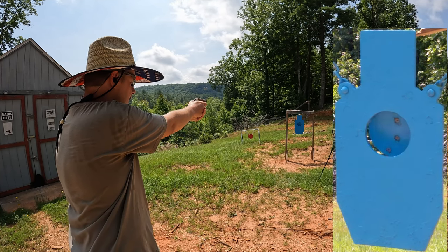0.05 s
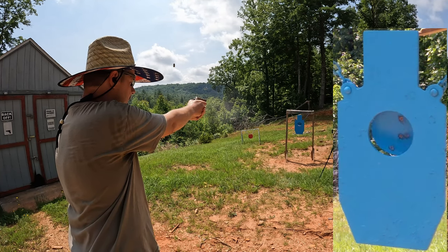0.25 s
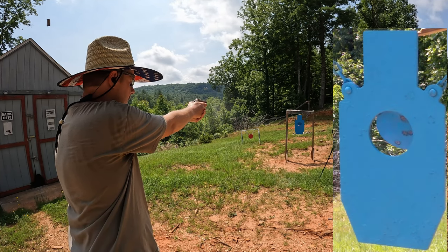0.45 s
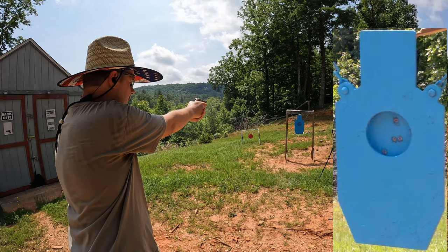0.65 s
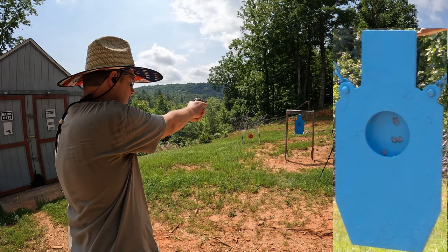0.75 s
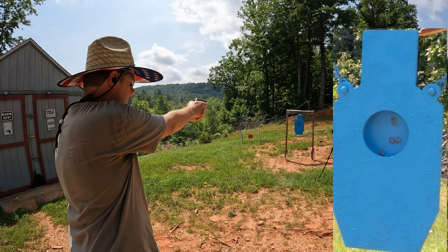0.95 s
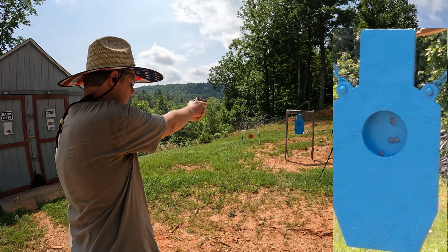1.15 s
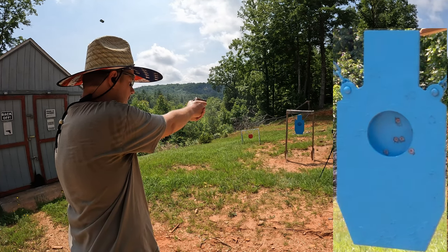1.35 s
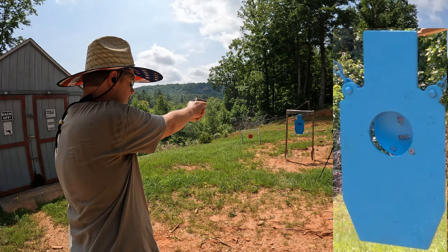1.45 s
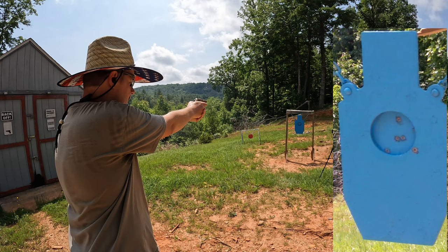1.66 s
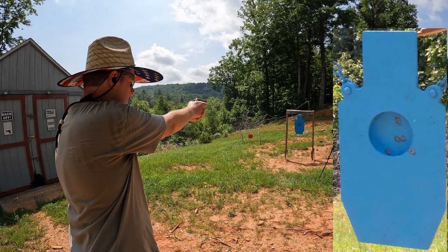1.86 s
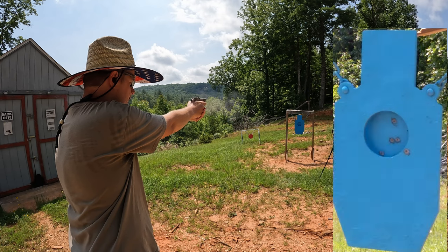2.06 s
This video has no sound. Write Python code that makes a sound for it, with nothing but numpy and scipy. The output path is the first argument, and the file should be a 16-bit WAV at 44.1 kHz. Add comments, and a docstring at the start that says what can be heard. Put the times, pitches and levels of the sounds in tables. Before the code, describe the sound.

Two sharp, overloaded pistol shots about a second apart, each followed almost instantly by a bright steel clang, then a softer clank as the hinged plate shuts; echoes roll through woods, close camera microphone, nearly mono.

```python
"""An outdoor range: two pistol shots, pulse and crack, overload a camera microphone; shed and tree line throw them back.
Each bullet clangs on a close steel target, built from decaying sines and a noise splash, and knocks its hinged
centre plate open; about half a second later the plate falls shut with a clank. The woods roll with filtered-noise
echoes, faint pure ticks sound, and the steel still rings from an earlier hit."""
import sys
import numpy as np
from scipy import signal
from scipy.fft import rfft, irfft
from scipy.io import wavfile
from scipy.ndimage import uniform_filter1d, minimum_filter1d

SR = 44100
rng = np.random.default_rng(int(sys.argv[2]) if len(sys.argv) > 2 else 0)


def output_pcm(signal):
    """Save a mono or channel-first signal as 16-bit PCM at the path in sys.argv[1].

    Samples are clipped to [-1, 1] before scaling.
    """
    pcm = np.clip(np.atleast_2d(signal).T, -1, 1) * 32767
    wavfile.write(sys.argv[1], SR, np.round(pcm).astype(np.int16))


N = 92610  # length [samples]

# All colours are (frequency [Hz], relative level [dB per Hz]); all decays are (frequency [Hz], t60 [s]).

# Steady roll of the wooded valley: (frequency [Hz], relative level [dB per Hz])
ROLL_COLOUR = [(18, -70), (30, -43), (259, -19), (415, -11), (499, -7.5), (540, -4), (844, -2.5),
               (1130, -13.5), (1220, -8.5), (1910, -26.5), (2540, -22.5), (2750, -31.5), (3400, -33),
               (5040, -32), (16000, -68)]
ROLL_DB, ROLL_PATCHY_DB = -34, 2

# Modes of the steel target: (frequency [Hz], t60 [s], then a level [dB] for each kind of blow:
# bullet on the centre, bullet on the rim, plate shuts flat, plate shuts on its edge)
STEEL_MODES = [(587, .21, -30, -26, -18, -23), (1200, 4.5, -47, -46, -46, -54),
               (1335, .9, -42, -42, -38, -33), (1470, 3.0, -48, -50, -49, -60),
               (2143, 2.7, -56, -33, -64, -58), (2506, 1.9, -56, -50, -40, -41),
               (2815, .9, -60, -60, -48, -60), (3192, 3.0, -62, -60, -66, -53),
               (4097, .7, -52, -46, -64, -47), (4494, .2, -35, -32, -35, -50),
               (4502, 1.3, -52, -46, -48, -58), (4861, .8, -52, -47, -43, -58),
               (5143, .4, -56, -31, -56, -62), (5496, .4, -50, -34, -52, -62),
               (6240, .27, -29, -32, -53, -58), (6654, .2, -32, -56, -58, -62),
               (6724, .25, -52, -32, -56, -62), (7000, .3, -54, -26, -48, -50),
               (7267, 2.0, -60, -54, -66, -64), (7440, .7, -58, -48, -60, -58),
               (7878, .45, -58, -38, -64, -56), (8145, .26, -34, -58, -64, -62),
               (8255, .33, -24, -58, -54, -47), (8597, .36, -60, -35, -60, -70),
               (9235, .2, -29, -58, -56, -70), (9512, .14, -60, -30, -70, -62),
               (9728, .5, -60, -58, -60, -70), (10620, .2, -56, -48, -59, -60),
               (11500, .18, -56, -48, -62, -68), (12340, .22, -48, -48, -55, -63),
               (12520, .16, -58, -45, -64, -68), (13325, .33, -42, -56, -55, -53),
               (13385, .12, -36, -40, -62, -68), (14460, .11, -46, -48, -66, -70),
               (14740, .17, -58, -46, -66, -61), (15460, .11, -35, -46, -56, -61)]
TWIN_HZ, TWIN_SHARE = 9, .2  # mean spacing of each mode's neighbour, and its relative amplitude
# Bullets on steel: (time [s], blow [index of the mode level], level [dB])
BULLET_HITS = [(-.85, 1, 2), (0.2522, 0, 2), (1.2722, 1, 1.5)]
SURGE_DB, SURGE_S = 16, .078  # early boost of a hard hit, and how long it lasts
SURGE_HZ = 5000  # the surge is full above this pitch and fades below it
# Lead spatter: (frequency [Hz], relative level [dB per Hz]) and (frequency [Hz], t60 [s])
SPLASH_COLOUR = [(40, -32.5), (150, -24), (600, -3.5), (1500, 3.5), (3000, -4), (6000, -0.5), (9000, -9),
                 (15000, -21.5)]
SPLASH_DECAY = [(200, 0.087), (2000, 0.15), (6000, 0.14), (14000, 0.14)]
SPLASH_DB, SPLASH_RISE_S = -5.5, 0.00044
# The centre plate falls shut: (time [s], blow [index of the mode level], level [dB])
PLATE_SHUTS = [(-.09, 2, 0), (0.6205, 2, 0), (1.7115, 3, 1)]
# Noise of the shutting plate: (frequency [Hz], relative level [dB per Hz]) and (frequency [Hz], t60 [s])
CLANK_COLOUR = [(30, -27), (200, 1), (500, 13), (1400, 4), (2200, -3), (4500, -5), (7000, -3.5),
                (10000, -16.5), (15500, -22)]
CLANK_DECAY = [(200, 0.08), (2000, 0.12), (6000, 0.33), (14000, 0.1)]
CLANK_DB, CLANK_RISE_S = -32.5, 0.003

# Pistol shots: (time [s], level [dB])
PISTOL_SHOTS = [(0.2145, -1), (1.2354, 0)]
# Direct blast and near reflections: (delay [s], thump level [dB], crack level [dB])
NEAR_PATHS = [(0, -2.5, 6), (.0009, 9.5, 19), (.0029, 21, 4), (.0054, 26.5, 14), (.0095, 18, 10.5),
              (.0136, 21, 7.5), (.0155, 13.5, 4.5), (.0205, 1, 11)]
THUMP_S, THUMP_RISE_S, CRACK_S = 0.0013, 0.00011, 0.0016  # time constants
# Crack of the blast: (frequency [Hz], relative level [dB per Hz])
CRACK_COLOUR = [(500, -17.5), (2000, -5.5), (3300, -8), (4600, -3), (6200, -7), (8000, -10), (11000, -15),
                (16000, -23)]
# Dull single echoes from the shed and the tree line: (delay [s], level [dB])
DULL_ECHOES = [(.0305, 6), (0.0355, 5), (.145, -25), (.150, -22), (.160, -20.5), (.172, -16.5)]
# Their colour, before the low cut: (frequency [Hz], relative level [dB per Hz])
ECHO_COLOUR = [(60, -20), (180, -3), (400, -3), (620, 0), (1000, -7), (2000, -18), (5000, -30),
               (15000, -55)]
ECHO_PEAK_S, ECHO_LOW_CUT_HZ = 0.00215, 140
# Blast scattered by the ground and the shed: (frequency [Hz], relative level [dB per Hz])
# and (frequency [Hz], t60 [s])
BOOM_COLOUR = [(25, -25), (50, -11.5), (90, 4.5), (160, 4.5), (250, 0), (600, -1.5), (1000, -3.5),
               (2000, -16), (5000, -21), (15000, -32.5)]
BOOM_DECAY = [(50, .12), (200, 0.12), (700, 0.13), (3000, 0.12), (12000, 0.15)]
BOOM_DB, BOOM_RISE_S = 17.5, 0.0043
# Crack scattered at once by leaves and grass: (frequency [Hz], relative level [dB per Hz])
# and (frequency [Hz], t60 [s])
LEAVES_COLOUR = [(30, -32), (120, -3), (600, -19), (1600, 2), (3000, -2.5), (5500, 3), (9000, -11.5),
                 (15000, -31)]
LEAVES_DECAY = [(200, .35), (2000, .45), (6000, 0.34), (14000, .35)]
LEAVES_DB, LEAVES_RISE_S = -14, 0.022
# Diffuse return from the trees: (frequency [Hz], relative level [dB per Hz]) and (frequency [Hz], t60 [s])
TREES_COLOUR = [(30, -45), (90, -14.5), (170, 3.5), (350, 3), (750, 0), (1500, -6), (3000, -18.5),
                (5500, -17), (9000, -22), (15000, -43)]
TREES_DECAY = [(60, 0.57), (200, 0.52), (700, 0.69), (2500, 0.98), (6000, 1.63), (9000, 0.79),
               (14000, 0.601)]
TREES_DB, TREES_RISE_S, TREES_DELAY_S = -22.5, 0.014, .11

# Faint metal ticks, likely spent cases landing: (time [s], frequency [Hz], level [dB])
CASE_TICKS = [(.995, 4900, -50.5), (2.01, 5150, -48)]
TICK_T60_S = 0.27

SPREAD_DB = -33  # level of a faint random stereo spread, relative to the mono sound
LIMIT_DB, RECOVER_DB_PER_S = -1, 162  # limiter threshold and recovery
AHEAD_S, SENSE_S = 0.023, 0.0089  # hold window and level-sensing window, both centred
CEILING = 0.95  # soft-clip amplitude
EDGE_HZ = 15900  # top of the recorded band


def amp(db):
    """Turns decibels into amplitude."""
    return 10 ** (np.asarray(db) / 20)


def evened(x):
    """Scales to rms 1."""
    return x / np.sqrt(np.mean(x ** 2) + 1e-20)


def read(points, hz):
    """Reads a table on a log-frequency axis."""
    f, value = np.transpose(points)
    return np.interp(np.log(hz + 1), np.log(f + 1), value)


def clock():
    """Seconds since the start of a sound."""
    return np.arange(N) / SR


def decay(t, t60):
    """Exponential fade that falls by 60 dB in t60 seconds."""
    return np.exp(-np.log(1000) * t / t60)


def add(mix, s, sound):
    """Mixes a sound in at a time, which may lie before the start."""
    at = round(s * SR)
    sound = sound[max(-at, 0):]
    part = mix[max(at, 0):]
    part[:len(sound)] += sound[:len(part)]


def colour(x, spectrum):
    """Filters a sound by a spectrum."""
    gain = amp(read(spectrum, np.fft.rfftfreq(N, 1 / SR)))
    return irfft(rfft(x) * gain, N)


def noise(spectrum):
    """Noise of rms 1 with the given colour."""
    return evened(colour(rng.standard_normal(N), spectrum))


def tail(spectrum, t60, rise_s):
    """Coloured noise that swells and then dies at its own speed in each band."""
    t, hz = clock(), np.fft.rfftfreq(N, 1 / SR)
    z, out = rfft(noise(spectrum)), np.zeros(N)
    centres, times = np.transpose(t60)
    # each row of the identity is a band's weight: 1 at its centre, 0 at the other centres
    for band, seconds in zip(np.eye(len(t60)), times):
        weight = read(np.c_[centres, band], hz)
        out += irfft(z * weight, N) * decay(t, seconds)
    return out * (1 - np.exp(-t / rise_s))


def valley():
    """A steady, lumpy roll of far echoes: noise with smooth random patches in time and pitch."""
    z = signal.stft(noise(ROLL_COLOUR), SR, nperseg=1024)[2]
    patches = uniform_filter1d(rng.standard_normal(z.shape), size=10, axis=0)
    patches = evened(uniform_filter1d(patches, size=4, axis=1))
    roll = signal.istft(z * amp(ROLL_PATCHY_DB * patches), SR, nperseg=1024)[1][:N]
    return amp(ROLL_DB) * evened(roll)


def ring(blow, surge_db=0):
    """Steel modes beat with close neighbours; the blow sets their levels, a hard hit makes high ones surge."""
    t, out = clock(), np.zeros(N)
    early_db = surge_db * np.exp(-(t / SURGE_S) ** 2)
    draws = rng.random((len(STEEL_MODES), 3))
    for (hz, t60, *levels), (phase, twin_phase, spread) in zip(STEEL_MODES, draws):
        twin_hz = hz + TWIN_HZ * (.5 + spread)
        main = np.sin(2 * np.pi * (hz * t + phase))
        twin = TWIN_SHARE * np.sin(2 * np.pi * (twin_hz * t + twin_phase))
        level_db = levels[round(blow)] + early_db * min(hz / SURGE_HZ, 1) ** 2
        out += amp(level_db) * decay(t, t60) * (main + twin)
    return out


def steel():
    """Bullets splash and ring the steel; the hinged plate clanks shut, its modes swelling in softly."""
    t, out = clock(), np.zeros(N)
    for s, blow, db in BULLET_HITS:
        splash = amp(SPLASH_DB) * tail(SPLASH_COLOUR, SPLASH_DECAY, SPLASH_RISE_S)
        add(out, s, amp(db) * (ring(blow, SURGE_DB) + splash))
    for s, blow, db in PLATE_SHUTS:
        soft_ring = ring(blow) * (1 - np.exp(-t / CLANK_RISE_S))
        clank = amp(CLANK_DB) * tail(CLANK_COLOUR, CLANK_DECAY, CLANK_RISE_S)
        add(out, s, amp(db) * (soft_ring + clank))
    return out


def blast():
    """Muzzle blast: a pressure pulse and a crack on every near path, dull echoes, and the scattered boom."""
    t, near, far = clock(), np.zeros(N), np.zeros(N)
    # pressure jumps up, then swings below zero
    thump = (1 - t / THUMP_S) * np.exp(-t / THUMP_S) * (1 - np.exp(-t / THUMP_RISE_S))
    for delay, thump_db, crack_db in NEAR_PATHS:
        crack = noise(CRACK_COLOUR) * np.exp(-t / CRACK_S)
        add(near, delay, amp(thump_db) * thump + amp(crack_db) * crack)
    swell = t / ECHO_PEAK_S * np.exp(1 - t / ECHO_PEAK_S)
    for delay, db in DULL_ECHOES:
        add(far, delay, amp(db) * noise(ECHO_COLOUR) * swell)
    low_cut = signal.butter(2, ECHO_LOW_CUT_HZ, "high", fs=SR, output="sos")
    boom = amp(BOOM_DB) * tail(BOOM_COLOUR, BOOM_DECAY, BOOM_RISE_S)
    return near + signal.sosfilt(low_cut, far) + boom


def pistol():
    """Each shot is a blast with its scatter from the leaves, then its later return from the trees."""
    out = np.zeros(N)
    for s, db in PISTOL_SHOTS:
        leaves = amp(LEAVES_DB) * tail(LEAVES_COLOUR, LEAVES_DECAY, LEAVES_RISE_S)
        add(out, s, amp(db) * (blast() + leaves))
        trees = amp(TREES_DB) * tail(TREES_COLOUR, TREES_DECAY, TREES_RISE_S)
        add(out, s + TREES_DELAY_S, amp(db) * trees)
    return out


def cases():
    """Tiny single-pitched ticks: decaying sines."""
    t, out = clock(), np.zeros(N)
    for s, hz, db in CASE_TICKS:
        add(out, s, amp(db) * decay(t, TICK_T60_S) * np.sin(2 * np.pi * hz * t))
    return out


def scene():
    """The mono scene is given slight stereo width by a faint random smear, opposite in left and right."""
    mono = valley() + steel() + pistol() + cases()
    taps = rng.standard_normal(size=256)
    smear = signal.oaconvolve(mono, taps / np.linalg.norm(taps))[:N]
    side = amp(SPREAD_DB) * smear
    return np.array([mono + side, mono - side])


def record(dry):
    """A look-ahead limiter ducks around loud moments, the peaks clip softly, and the band is limited."""
    power = uniform_filter1d((dry ** 2).mean(0), max(round(SENSE_S * SR), 1))
    power_db = 10 * np.log10(abs(power) + 1e-12)
    # the sensed level jumps up at once and falls back at a steady rate
    fall = clock() * RECOVER_DB_PER_S
    held_db = np.maximum.accumulate(power_db + fall) - fall
    over_db = np.maximum(held_db - LIMIT_DB, 0)
    duck_db = minimum_filter1d(-over_db, max(round(AHEAD_S * SR), 1))
    duck_db = uniform_filter1d(duck_db, size=256)
    hot = dry * amp(duck_db) / CEILING
    clipped = CEILING * hot / (1 + hot ** 6) ** (1 / 6)
    low_pass = signal.firwin(255, EDGE_HZ, window=("kaiser", 8), fs=SR)
    return signal.oaconvolve(clipped, low_pass[None], "same")


dry = scene()
out = record(dry)
output_pcm(out)
```